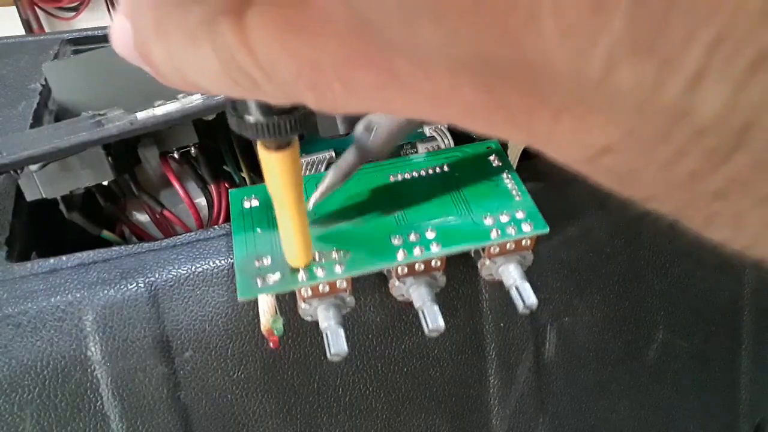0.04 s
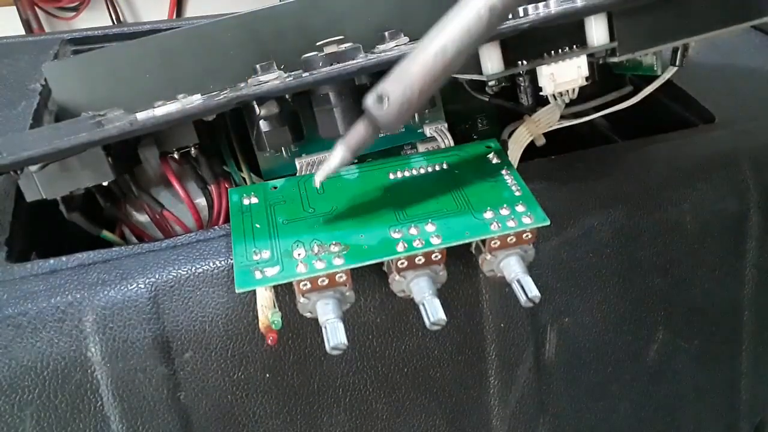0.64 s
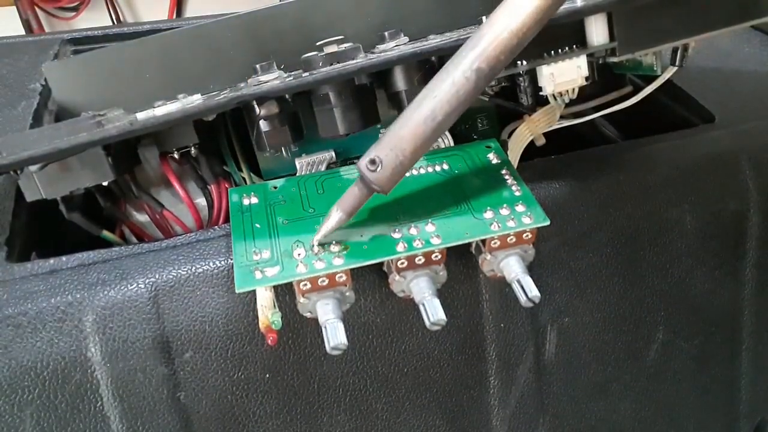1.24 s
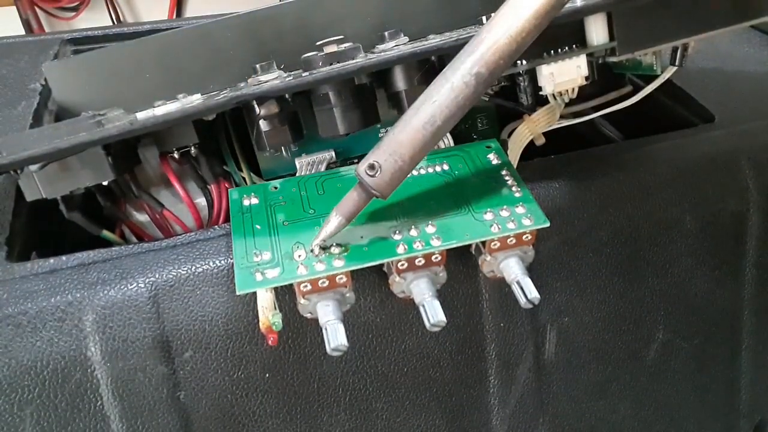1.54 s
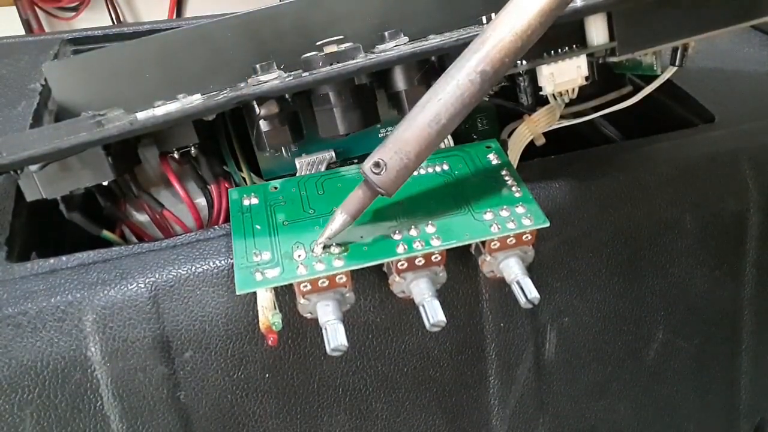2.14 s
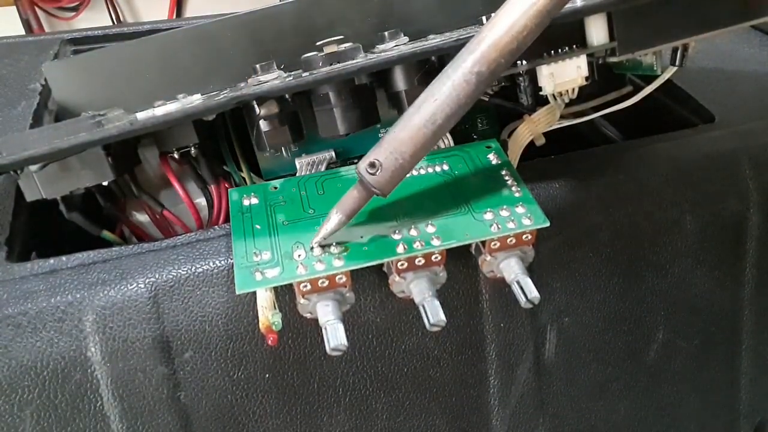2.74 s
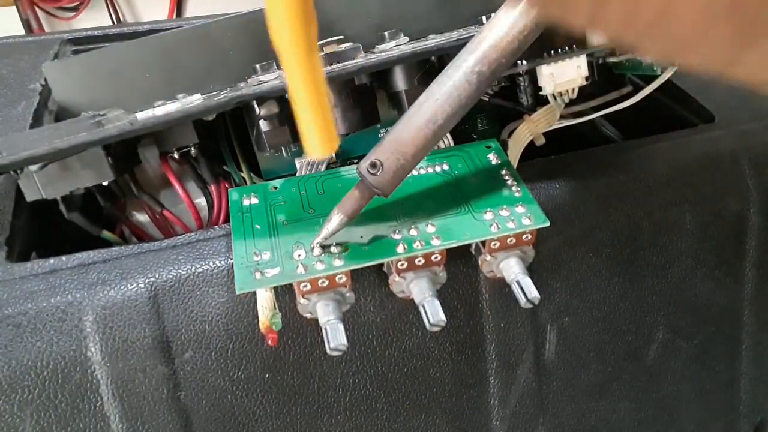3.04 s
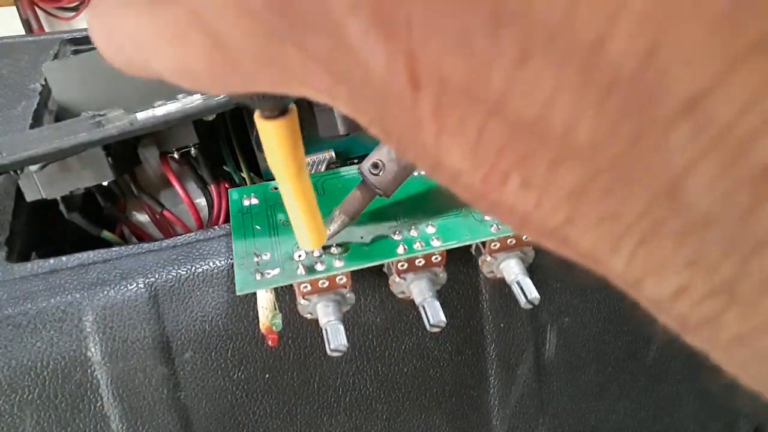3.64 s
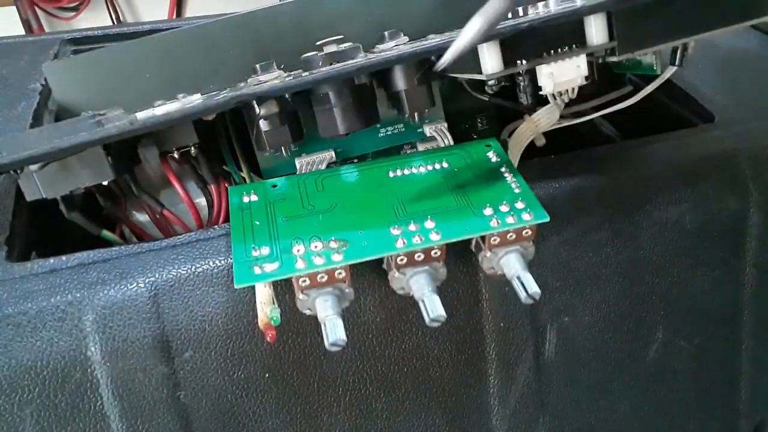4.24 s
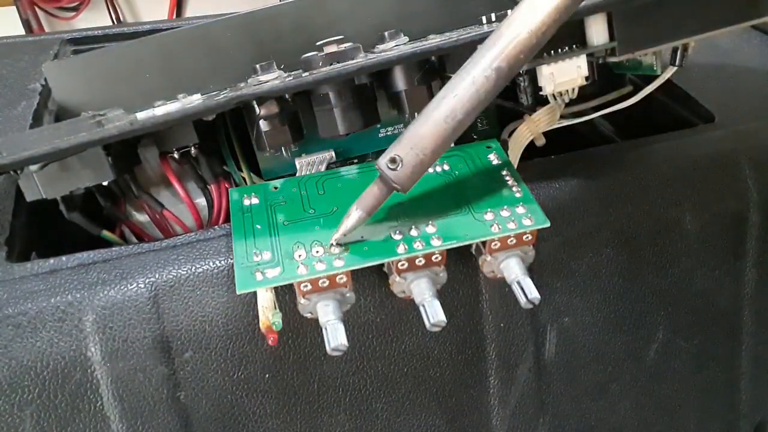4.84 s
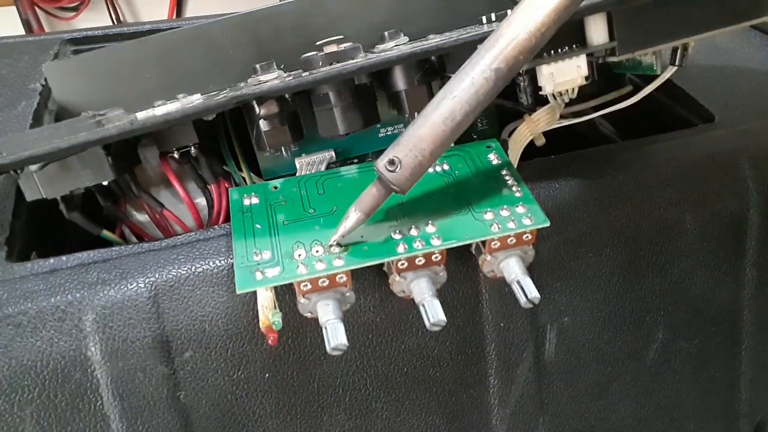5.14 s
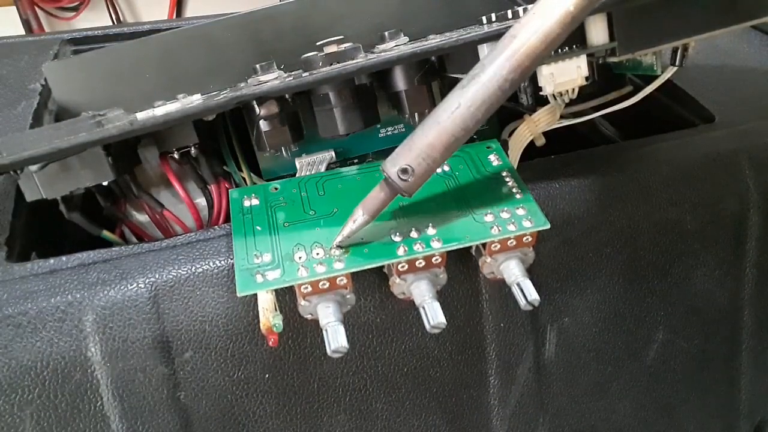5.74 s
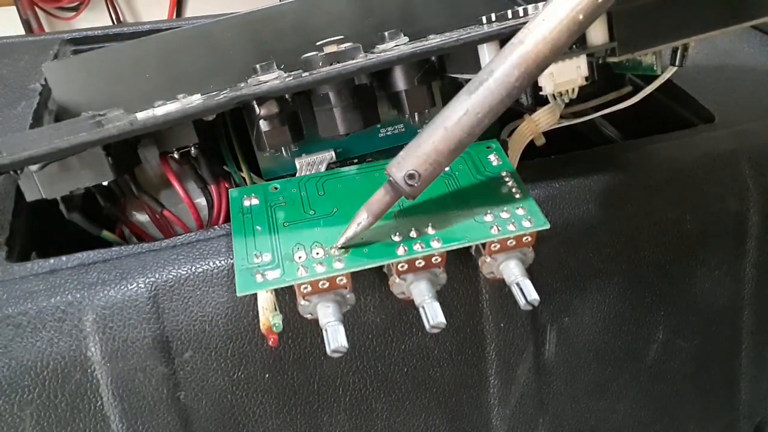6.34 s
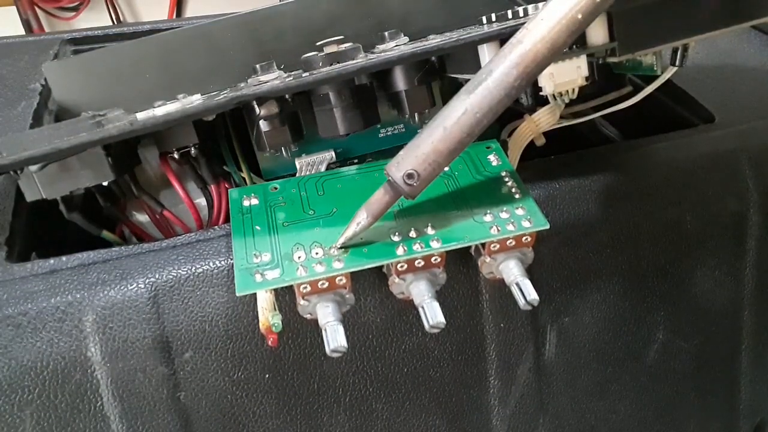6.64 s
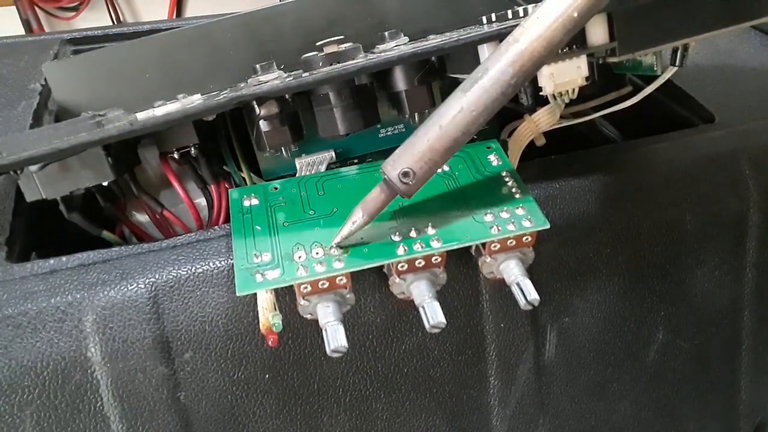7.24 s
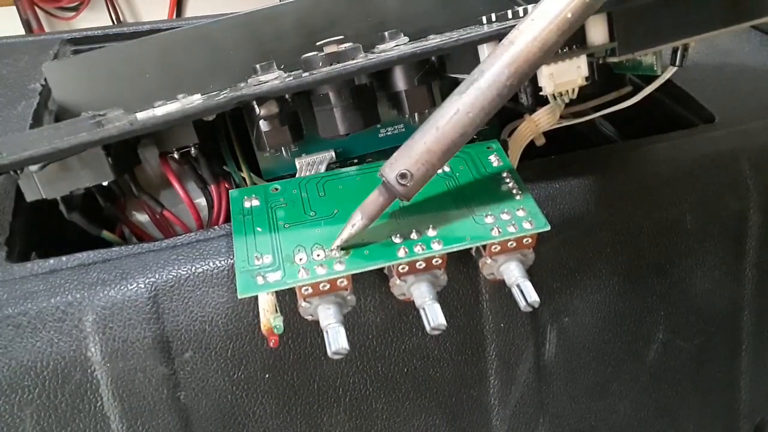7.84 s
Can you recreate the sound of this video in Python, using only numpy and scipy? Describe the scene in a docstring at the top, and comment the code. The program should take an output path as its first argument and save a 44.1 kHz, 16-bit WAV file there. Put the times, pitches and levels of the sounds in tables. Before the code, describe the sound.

Two sharp snaps of a solder sucker, each followed by short plunger slides, latch clicks and knocks, in a quiet small room.

```python
"""A spring-loaded desoldering pump at a circuit board, in a small room with a fan-like hiss. At 0.2 s it fires:
the piston sucks air, the rod hits its stop, the hollow case under the board booms. From 0.9 to 2.1 s it is
cocked in two strokes: the plunger slides, the catch clicks in and the rod knocks home; after the first, the
trigger is let go and the rod springs back against its stop. Faint, very high fizz swells come and go; tools tap
the board. It fires again at 3.9 s and is cocked from 4.5 to 5.7 s, with another release near 5.0 s. At 7.3 s, a
soft bump and a last faint fizz."""
import sys
import numpy as np
from scipy import signal
from scipy.fft import rfft, irfft, next_fast_len
from scipy.io import wavfile
from scipy.ndimage import map_coordinates

SR = 44100
rng = np.random.default_rng(int(sys.argv[2]) if len(sys.argv) > 2 else 0)


def dump_mix(stems):
    """Bounce the given channels to the path in sys.argv[1] as a 16-bit WAV at rate SR."""
    frames = np.atleast_2d(stems).T  # one column per channel
    limited = np.clip(frames, -1, 1)  # hard clip at full scale
    pcm = np.round(limited * 32767).astype(np.int16)
    wavfile.write(sys.argv[1], SR, pcm)


N = 347508
T = np.arange(SR // 2) / SR  # time within one event, s

# spectrum of a hard contact: f/Hz, level/dB
CONTACT_SPECTRUM = [(100, -20.5), (900, -21), (2500, -8), (4000, -1), (7500, -3), (9000, -14),
                    (12000, -7.5), (16000, -13.5)]
# cocking strokes: catch t/s, slide length/s, scrape/dB, breakaway/dB, click/dB, pitch factor, ping/dB
COCKING_STROKES = [(0.995, 0.088, -42.5, -40, -1.5, 0.98, -21),
                   (1.967, 0.097, -48.5, -40.5, -3, 0.995, -33),
                   (4.5824, .1172, -49.5, -38, -6.5, 0.99, -21), (5.4873, 0.1, -47.5, -34, -12, 1.0, -20.5)]


def amp(db):
    """Decibels to gain."""
    return 10 ** (np.asarray(db) / 20)


def fade(t60_s):
    """Exponential decay, 60 dB in t60_s."""
    return np.exp(-np.log(1000) * T / t60_s)


def norm(x):
    """Scale to unit energy."""
    return x / np.linalg.norm(x)


def along(points, hz):
    """Interpolate (f/Hz, value) points over log frequency."""
    f, values = np.transpose(points)
    return np.interp(np.log(hz + 1), np.log(f + 1), values)


def filtered(x, response):
    """Zero-phase filter with gain response(hz)."""
    size = next_fast_len(len(x) + 8192)
    return irfft(rfft(x, size) * response(np.fft.rfftfreq(size, 1 / SR)), size)[:len(x)]


def noise(spectrum, size=len(T)):
    """Coloured noise, rms 1."""
    x = filtered(rng.standard_normal(size), lambda hz: amp(along(spectrum, hz)))
    return x / x.std()


def resonant(x, humps):
    """Lift x around (f/Hz, width/Hz, gain/dB) resonances; rms 1."""
    y = filtered(x, lambda f: amp(sum(db * np.exp(-((f - hz) / width) ** 2) for hz, width, db in humps)))
    return y / y.std()


def wobble(rate_hz, size=len(T)):
    """Smooth random curve with knots at rate_hz."""
    return map_coordinates(rng.standard_normal(size // 16), [np.arange(size) * rate_hz / SR])


def add(track, s, x):
    """Mix x into track at s seconds."""
    part = track[round(s * SR):][:len(x)]
    part += x[:len(part)]


def hollow_tone(hz, blur_rad):
    """Breathy resonance on a moving pitch, rms 1."""
    return np.sqrt(2) * np.sin(2 * np.pi * np.cumsum(hz) / SR + blur_rad * wobble(300))


def ring(modes, pitch=1, attack_s=0.00055):
    """Damped (f/Hz, energy/dB, t60/s) modes that build up while the faces touch."""
    onset = 1 - np.exp(-T / attack_s)
    out = np.zeros(len(T))
    for k, (hz, db, t60_s) in enumerate(modes):
        mode = np.sin(2 * np.pi * hz * pitch * T) * onset * fade(t60_s)
        out += (-1) ** k * amp(db + rng.normal()) * norm(mode)
    return out


def crack(t60_s, attack_s=0.0011):
    """Brief pitchless rattle of two hard faces meeting."""
    z = rfft(rng.standard_normal(len(T)) * fade(t60_s) * (1 - np.exp(-T / attack_s)))
    flat_burst = irfft(z / np.abs(z), len(T)) * fade(10 * t60_s)  # brief contact: even excitation
    return norm(filtered(flat_burst, lambda hz: amp(along(CONTACT_SPECTRUM, hz))))


def in_room(x, wet_db=0, build_s=0.0017):
    """Direct sound plus dense reflections from near walls."""
    decay = [(150, 0.19), (900, 0.16), (4000, 0.16), (9000, 0.16), (16000, 0.12)]  # reverberation time: f/Hz, t60/s
    colour = [(200, -8.5), (900, -2.5), (4000, -5.5), (8000, -4.5), (16000, -1)]  # reflection spectrum: f/Hz, level/dB
    bands_hz, t, z = signal.stft(rng.standard_normal(len(T)), SR, nperseg=256)
    z = z * np.exp(-np.log(1000) * t / along(decay, bands_hz)[:, None])
    tail = signal.istft(z, SR, nperseg=256)[1][:len(T)]
    tail = norm(tail * (1 - np.exp(-(T / build_s) ** 2)))
    tail = filtered(tail, lambda hz: amp(along(colour, hz)))
    return x + amp(wet_db) * signal.fftconvolve(x, tail)[:len(T)]


def background(rumble_db=-59, hiss_db=-61.5, rest_db=-63):
    """Room rumble, hollow hiss and wavering hum swell and sink together."""
    drift = [(0, -58.5), (0.6, -62), (1.75, -66), (2.75, -67.5), (3.55, -61), (4.25, -63), (5.95, -65),
             (6.6, -62), (7.88, -60.5)]  # background swell, taken relative to rest_db: t/s, level/dB
    rumble_spectrum = [(15, -65), (25, -23), (52, -11.5), (76, 5), (124, -12), (145, -6.5), (183, -4),
                       (269, -2), (334, -9.5), (367, -6.5), (531, -9), (583, -5.5), (806, -17),
                       (1000, -24.5), (1300, -49), (2200, -120)]  # f/Hz, level/dB
    hiss_spectrum = [(600, -29), (900, -4.5), (1400, -2.5), (1750, -3.5), (2500, -4), (3100, -9.5),
                     (3500, 3.5), (4200, 0.5), (5100, -2.5), (6500, -6), (7700, -5.5), (8300, -19),
                     (9200, -22), (16000, -13.5)]  # f/Hz, level/dB
    hollows = [(1215, 100, 5), (2263, 93, 8.5), (2780, 120, 5.5), (3700, 89, 3), (4580, 66, 7.5),
               (5860, 200, 7.5), (7170, 150, 7.5)]  # hiss resonances: f/Hz, width/Hz, gain/dB
    hum_lines = [(120, -66), (578, -67.5), (1217, -75.5)]  # f/Hz, level/dB
    t = np.arange(N) / SR
    swing_db = np.interp(t, *np.transpose(drift)) - rest_db
    rumble = amp(rumble_db + swing_db + 0.45 * wobble(6.1, N)) * noise(rumble_spectrum, N)
    hiss = amp(hiss_db + swing_db + 0.4 * wobble(5.4, N)) * resonant(noise(hiss_spectrum, N), hollows)
    hum = sum(amp(db + 3 * wobble(4.7, N)) * np.sin(2 * np.pi * hz * t + 0.81 * wobble(16, N))
              for hz, db in hum_lines)
    return rumble + hiss + amp(swing_db / 2) * hum


def high_fizz(level_db=-1):
    """Faint, very high fizz in swells, with a thin wandering squeal."""
    swells = [(1.47, -68.5, 65.5, 76), (4.27, -70, 97, 8), (7.34, -72, 22, 44)]  # peak t/s, level/dB, rise/(dB/s), fall/(dB/s)
    fizz_spectrum = [(7000, -29.5), (10500, 2.5), (12500, 5.5), (16000, -4)]  # f/Hz, level/dB
    t = np.arange(N) / SR
    envelope = sum(amp(db - np.maximum(rise * (s - t), fall * (t - s))) for s, db, rise, fall in swells)
    squeal_gain = amp(-8 + 4 * wobble(12, N))
    squeal_hz = 12400 + 700 * wobble(7, N) + 200 * wobble(600, N)
    squeal = squeal_gain * np.sin(2 * np.pi * np.cumsum(squeal_hz) / SR)
    return envelope * amp(level_db + 1.5 * wobble(40, N)) * (noise(fizz_spectrum, N) + squeal)


def case_booms(level_db=26, attack_s=0.0085):
    """Recoil and hand bump the board against the hollow case."""
    bumps = [(0.185, -24.5, .99), (0.2227, -25, 0.98), (3.921, -28.5, 0.9), (3.989, -36, 0.95),
             (7.316, -44, 1.45)]  # t/s, level/dB, pitch factor
    case_modes = [(122, 0, .17), (167, -2, .14), (268, -5, .1)]  # f/Hz, energy/dB, t60/s
    out = np.zeros(N)
    for s, db, pitch in bumps:
        add(out, s, amp(level_db + db) * ring(case_modes, pitch) * (1 - np.exp(-T / attack_s)))
    return out


def tick(db, level_db=11):
    """A light contact cracks without ringing."""
    return amp(level_db + db) * in_room(crack(t60_s=0.0041), wet_db=-0.5)


def tool_taps():
    """Nozzle and iron touch the board lightly."""
    touches = [(1.4140, -37), (1.564, -39.5), (2.543, -44.5), (3.8802, -35.5)]  # t/s, level/dB
    out = np.zeros(N)
    for s, db in touches:
        add(out, s, tick(db))
    return out


def slides(slip_db=5, creep_s=0.016, creep_db=-6.5, breakaway_s=0.0092, start_hz=1900, end_hz=950):
    """The piston creeps, breaks away and scrapes in uneven slips; coils chafe, the air resonance falls."""
    scrape_spectrum = [(300, -18), (1000, -10.5), (1700, -0.5), (2600, -9.5), (3700, 1), (5000, -6),
                       (6200, -4), (7600, -4), (9500, -16), (16000, -16.5)]  # f/Hz, level/dB
    spring_resonances = [(3850, 300, 2.5), (7450, 400, 4.5)]  # f/Hz, width/Hz, gain/dB
    out = np.zeros(N)
    lead_s = 3 * creep_s
    t = T - lead_s
    for catch_s, length_s, scrape_db, breakaway_db, *_ in COCKING_STROKES:
        s = catch_s - length_s
        travel = np.clip(t / length_s, 0, 1)
        speed = np.exp(-((travel - 0.58) / 0.37) ** 2)  # fastest just past mid-stroke
        sliding = amp(scrape_db) * speed + amp(breakaway_db) * np.exp(-np.abs(t) / breakaway_s)
        creeping = amp(scrape_db + creep_db) * np.exp(-np.abs(t) / creep_s)
        envelope = np.where(t < 0, creeping, sliding) * (travel < 1)
        rasp = resonant(noise(scrape_spectrum) * amp(slip_db * wobble(450)), spring_resonances)
        cavity = amp(-14) * hollow_tone(start_hz + (end_hz - start_hz) * travel, blur_rad=1.5)
        squeak_gain = amp(-7.5 + slip_db * (wobble(150) - 0.5))
        squeak_hz = 4240 * (1 + 0.1 * wobble(60))
        squeak = squeak_gain * hollow_tone(squeak_hz, blur_rad=1.8)
        add(out, s - lead_s, in_room((rasp + cavity + squeak) * envelope))
        add(out, s, tick(breakaway_db + 8.5))  # piston comes unstuck
    return out


def catches(level_db=9, ping_hz=847, ping_t60_s=0.07, chatter_s=0.0063, chatter_db=-16):
    """The catch drops in after each stroke: bright ring, crack, and a ping of the barrel's air."""
    catch_modes = [(2835, -13, 0.02), (3760, -1, 0.0062), (5340, -6, .004), (7700, -13.5, 0.001),
                   (11500, -12, .001)]  # f/Hz, energy/dB, t60/s
    out = np.zeros(N)
    for s, _, _, _, db, pitch, ping_db in COCKING_STROKES:
        modes = ring(catch_modes, pitch) + ring([(ping_hz, ping_db, ping_t60_s)], pitch)
        click = in_room(modes, wet_db=-0.5) + amp(-6) * in_room(crack(t60_s=0.01), wet_db=3.5)
        add(out, s, amp(level_db + db) * click)
        add(out, s + chatter_s, tick(db + chatter_db))
    return out


def run_up(length_s, rise_db):
    """A short scrape that swells until the parts meet."""
    return norm(noise(CONTACT_SPECTRUM) * (T < length_s) * amp(rise_db * np.minimum(T / length_s, 1)))


def knocks(level_db=9, scrape_s=0.008, graze_s=0.0043, graze_hz=4040, chatter_s=0.0063, chatter_db=-10):
    """Blows of rod and trigger: each scrapes in, grazes the barrel, knocks and chatters; grip and depth set the
    ring. Those at 1.14 and 4.98 s are the trigger letting go before the rod flies to its stop; the others are
    the rod knocking home."""
    blows = [(1.1386, -3, 3520, -1.5, -4, -10.5), (1.1850, -18.5, 4350, -7.5, 6.5, -3.5),
             (2.0980, -13, 2980, -1, 3.5, -1.5), (4.77, -10, 5530, -6, 0.5, -15),
             (4.9810, -10.5, 3990, 4, -4, -32), (5.6457, -15.5, 4520, 0, 7, -6.5)]  # t/s, level/dB, ring f/Hz, ring/dB, barrel/dB, lead-in/dB
    rod_modes = [(2850, -13.5, 0.017), (3687, -8, 0.0033), (5250, -2.5, 0.0016), (7580, -8.5, 0.0027),
                 (8995, -10.5, .004)]  # f/Hz, energy/dB, t60/s
    barrel_modes = [(245, -15.5, .04), (370, -18.5, 0.045), (873, -12, .013), (1056, -17.5, 0.0067)]  # f/Hz, energy/dB, t60/s
    out = np.zeros(N)
    for s, db, ring_hz, ring_db, barrel_db, lead_db in blows:
        modes = ring(rod_modes) + ring([(ring_hz, ring_db, 0.032)]) + amp(barrel_db) * ring(barrel_modes)
        blow = in_room(modes, wet_db=1) + amp(-3) * in_room(crack(t60_s=0.01), wet_db=5)
        graze = amp(-3) * (ring(rod_modes) + crack(t60_s=0.01)) + ring([(graze_hz, 2, 0.025)])
        lead_gain = amp(level_db + db + lead_db - 3)
        add(out, s - scrape_s, lead_gain * in_room(run_up(scrape_s, rise_db=16.5)))
        add(out, s - graze_s, lead_gain * in_room(graze))
        add(out, s, amp(level_db + db) * blow)
        add(out, s + chatter_s, tick(db + chatter_db))
    return out


def clack(ring_hz, grip_db, crack_db):
    """One hollow contact of rod and stop, carried into the grip."""
    stop_modes = [(4140, -3, 0.0073), (5300, -1, 0.0033), (7350, -7.5, .004), (11700, -10, 0.0011)]  # f/Hz, energy/dB, t60/s
    grip_modes = [(172, -11.5, 0.14), (257, -11, .04), (361, -16.5, 0.087), (487.5, -21, .025),
                  (930, -23.5, .015)]  # f/Hz, energy/dB, t60/s
    modes = ring(stop_modes) + ring([(ring_hz, 2, 0.0065)]) + amp(grip_db) * ring(grip_modes)
    return in_room(modes, wet_db=-2) + amp(crack_db) * in_room(crack(t60_s=0.012), wet_db=4)


def stops(level_db=8, chatter_s=0.0063, chatter_db=-10.5, rebound_pitch=0.93):
    """The sprung rod hits its end stop, chatters and rebounds once, softer and lower."""
    hits = [(0.1859, -11.5, 1750, 16, 0.032, -43), (1.1979, -3.5, 2182, 1, 0.11, -30.5),
            (3.9193, -6.5, 2230, 4, .0137, -12.5), (4.9968, -5, 2180, 2, .1305, -26)]  # t/s, level/dB, ring f/Hz, grip/dB, rebound delay/s, rebound/dB
    out = np.zeros(N)
    for s, db, ring_hz, grip_db, delay_s, rebound_db in hits:
        add(out, s, amp(level_db + db) * clack(ring_hz, grip_db, crack_db=-2))
        add(out, s + chatter_s, tick(db + chatter_db))
        rebound = clack(rebound_pitch * ring_hz, grip_db=-6.5, crack_db=-1)
        add(out, s + delay_s, amp(level_db + rebound_db) * rebound)
    return out


def shots(nozzle_hz=725, pitch_fall=0.15, unlatch_s=0.0043, rise_s=0.00064, release_s=0.002):
    """The trigger trips, air tears through the nozzle, and the recoil rings the board."""
    # t/s, flight/s, trigger lead/s, trigger/dB, air/dB, swell/dB, nozzle tone/dB, board/dB
    firings = [(0.1729, 0.014, .0047, -13.5, -19, 1, -1, 1), (3.9022, .018, 0, -12, -23.5, -4, -19, -24.5)]
    board_resonances = [(269, 38, 2), (662, 35, 1), (873, 13, -6), (1110, 57, -10), (1340, 55, -8),
                        (1550, 63, -15.5)]  # f/Hz, width/Hz, energy/dB
    board_modes = [(hz, db, np.log(1000) / (np.pi * width)) for hz, width, db in board_resonances]
    out = np.zeros(N)
    for s, flight_s, lead_s, trigger_db, air_db, swell_db, tone_db, board_db in firings:
        trigger_s = s - lead_s
        travel = np.minimum(T / flight_s, 1)
        air = suction(swell_db * (travel - 1))
        tone_hz = nozzle_hz * (1 - pitch_fall * travel)  # falls as the chamber opens
        tone = amp(tone_db) * np.sin(np.pi * travel) * hollow_tone(tone_hz, blur_rad=0.9)
        envelope = (1 - np.exp(-T / rise_s)) * np.exp(-np.maximum(T - flight_s, 0) / release_s)
        add(out, trigger_s, tick(trigger_db))
        add(out, trigger_s + unlatch_s, tick(db=-6))  # piston cracks free
        add(out, s, amp(air_db) * in_room((air + tone) * envelope))
        add(out, trigger_s, amp(board_db) * ring(board_modes, attack_s=0.004))
    return out


def suction(level_db, flutter_db=2.5):
    """Fluttering rush of air drawn in by the flying piston."""
    air_spectrum = [(100, -13), (450, -1), (1100, 0), (1500, -7.5), (3000, -1.5), (7000, -3), (8800, -8),
                    (12000, -6.5), (16000, -8)]  # f/Hz, level/dB
    return noise(air_spectrum) * amp(level_db + flutter_db * wobble(700))


def scene():
    """Pump, tools, case and high fizz over the room background; mono."""
    pump = shots() + slides() + catches() + knocks() + stops()
    return (pump + tool_taps() + case_booms() + high_fizz() + background())[None]


def record(dry, top_hz=16000):
    """Soft-clip the tallest peaks, then low-pass steeply."""
    rounded = dry[0] / (1 + dry[0] ** 6) ** (1 / 6)
    return filtered(rounded, lambda hz: 1 / (1 + (hz / top_hz) ** 160))[None]


dry = scene()
out = record(dry)
dump_mix(out)
```